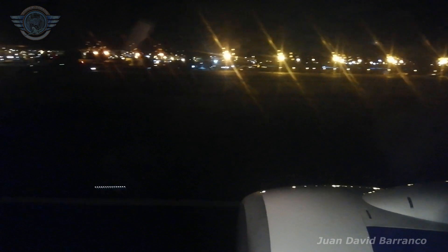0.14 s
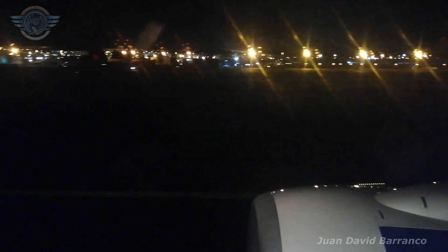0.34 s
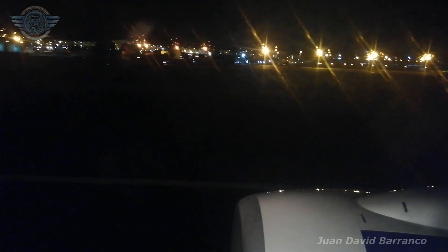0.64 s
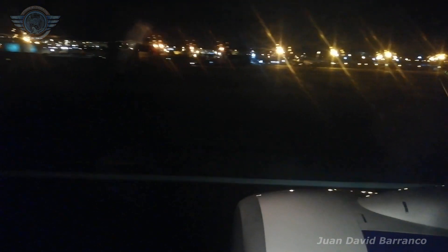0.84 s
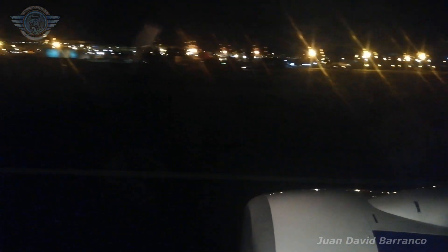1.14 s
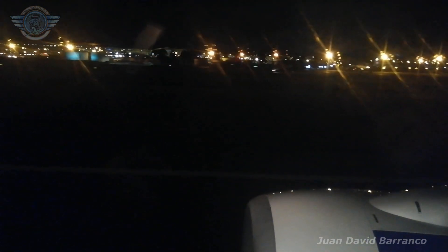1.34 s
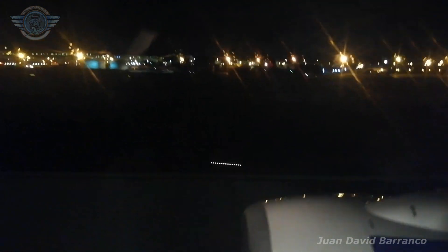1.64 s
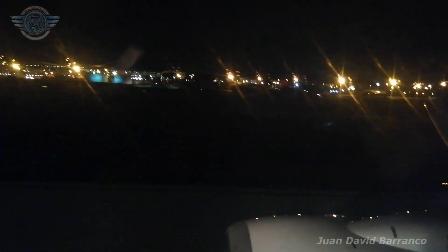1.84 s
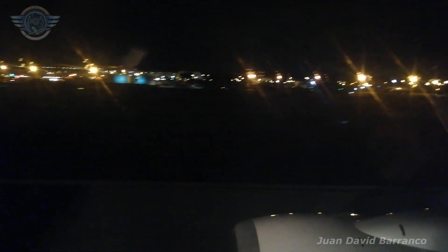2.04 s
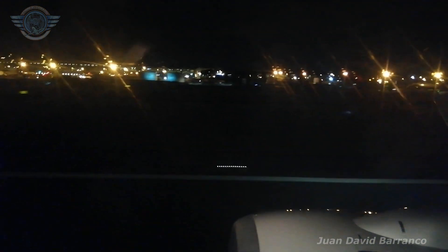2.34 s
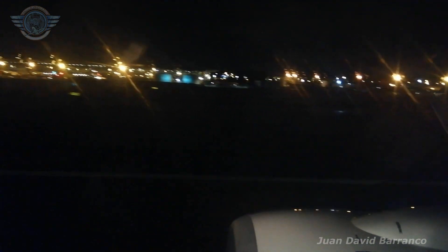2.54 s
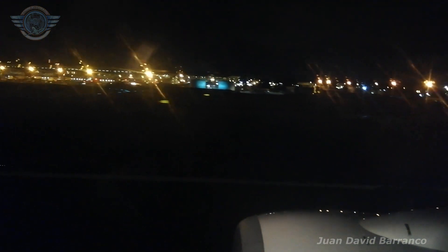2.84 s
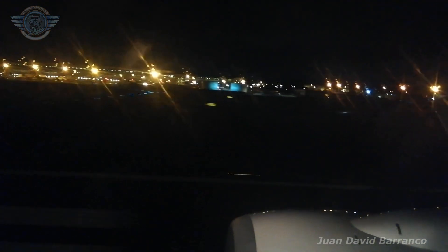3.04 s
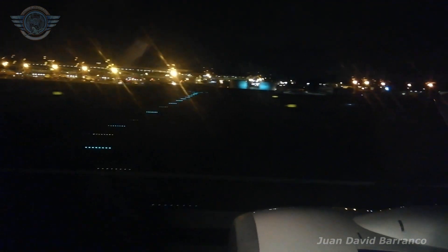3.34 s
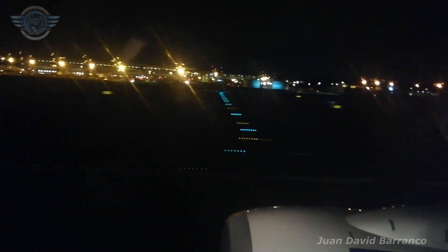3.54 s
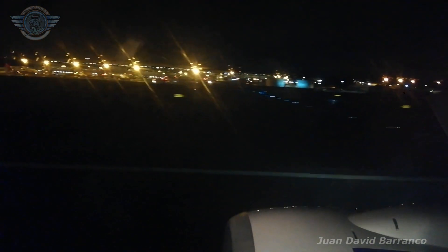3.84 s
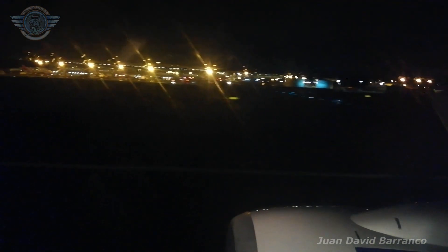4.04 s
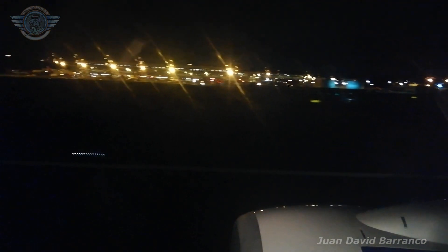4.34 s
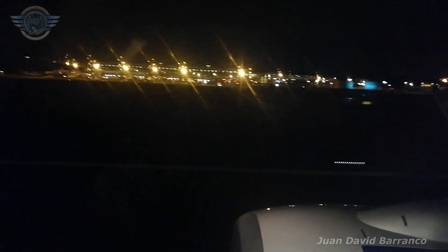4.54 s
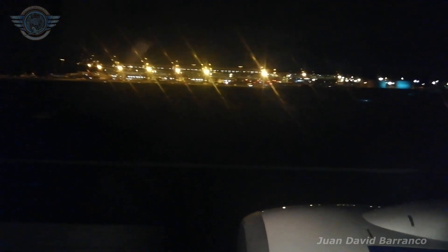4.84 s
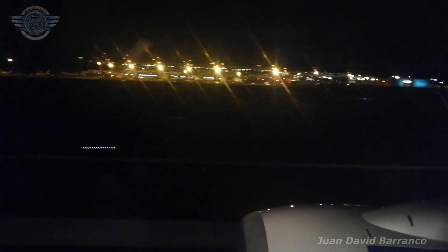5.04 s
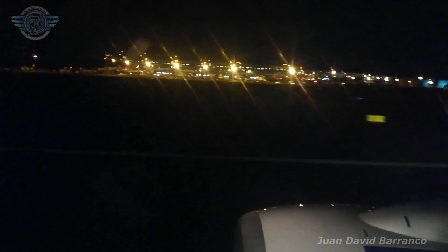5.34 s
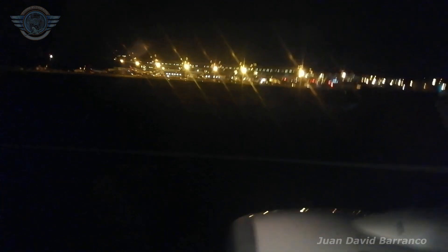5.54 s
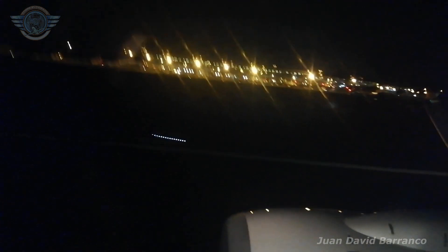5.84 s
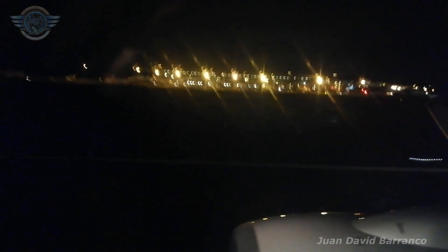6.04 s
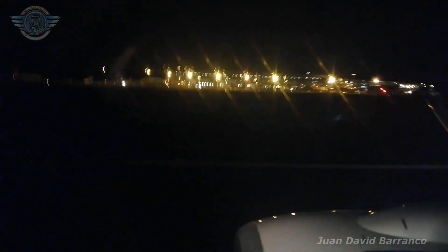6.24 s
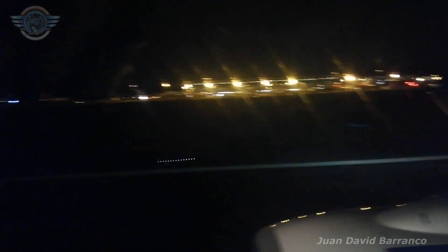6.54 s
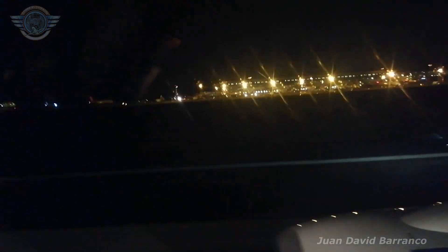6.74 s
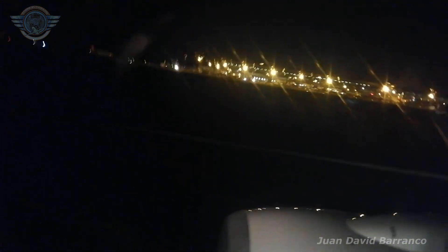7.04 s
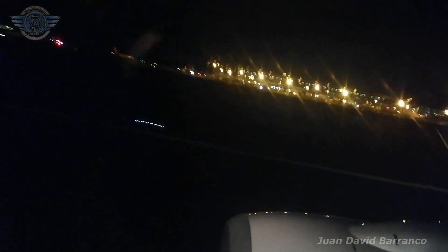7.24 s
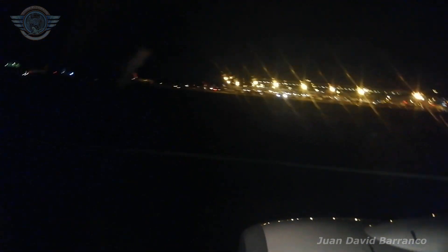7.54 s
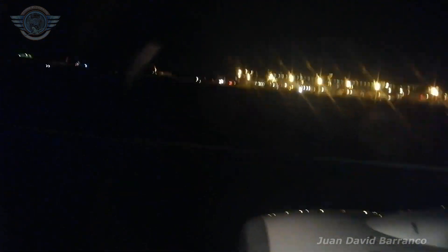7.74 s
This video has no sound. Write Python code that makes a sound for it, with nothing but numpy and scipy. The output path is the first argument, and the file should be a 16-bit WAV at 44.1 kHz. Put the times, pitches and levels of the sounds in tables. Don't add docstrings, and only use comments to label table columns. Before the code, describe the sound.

Low jet rumble, airflow and vent hiss fill an aircraft cabin before the wheels land, the hull booms, and loose panels slap, squeak and snap.

```python
import sys
import numpy as np
from scipy import signal
from scipy.fft import rfft, irfft, next_fast_len
from scipy.io import wavfile
from scipy.ndimage import uniform_filter1d, minimum_filter1d, map_coordinates

SR = 44100
rng = np.random.default_rng(int(sys.argv[2]) if len(sys.argv) > 2 else 0)


def gain_from_db(level_db):
    decades = np.asarray(level_db, float) / 20
    return 10 ** decades


def dump_mix(stems):
    frames = np.atleast_2d(stems).T
    limited = np.clip(frames, -1, 1)
    pcm = np.round(limited * 32767).astype(np.int16)
    wavfile.write(sys.argv[1], SR, pcm)


N = 348831

# time in seconds, frequency in Hz.
HULL_MODE = [(0, 57), (.9, 51.9), (1.4, 55.1), (1.75, 72.3), (2.3, 56.6), (3.4, 49.25), (4.5, 62),
             (5.6, 75.9), (5.85, 72.2), (6.1, 61.77), (6.35, 48.2), (6.7, 67), (6.95, 53.8), (7.25, 61.7),
             (7.55, 46.67), (7.91, 45.5)]
# centre in seconds, level in dB, half length in seconds.
GUSTS = [(.15, -13.5, .06), (.28, -14, 0.053), (.42, -16, 0.015), (.52, -16.5, 0.038), (.84, -15.5, 0.064),
         (1.11, -14, 0.098), (1.38, -15, 0.084), (1.5, -15, .05), (1.72, -14, 0.14), (1.97, -19, 0.051),
         (2.25, -20, 0.077), (2.4, -14, 0.046), (2.68, -16, 0.061), (2.9, -19, 0.09), (3.04, -21, 0.055),
         (3.3, -17.5, 0.19), (4.21, -22, 0.038), (4.42, -23, 0.11), (4.72, -26, 0.19), (5.0, -34, 0.035),
         (5.12, -17, .05), (5.3, -28, 0.024), (5.45, -27, 0.1)]
# centre in seconds, level in dB, half length in seconds.
BUMPS = [(5.7, -14, 0.12), (5.845, -8, 0.099), (5.96, -10.5, 0.072), (6.102, -7.5, 0.065),
         (6.322, -8.5, 0.12), (6.51, -11.5, 0.043), (6.65, -12, 0.049), (6.932, -12, 0.053),
         (7.1, -15, 0.14), (7.26, -10.5, 0.11), (7.535, -11.5, 0.059), (7.68, -12.5, 0.069),
         (7.82, -14, 0.1)]
# frequency in Hz, density in dB per Hz.
SHAKE_SPECTRUM = [(11, -38), (18, -15.5), (31, -10), (54, -1.5), (110, -7.5), (140, -25), (240, -120)]

# time in seconds, frequency in Hz, level in dB.
SHAFT = [(0, 212, -31), (1.3, 213, -23), (2, 208.6, -30.5), (2.6, 208, -30), (3.3, 204.9, -24),
         (4.3, 197.6, -31.5), (4.8, 196, -27.5), (5.05, 195, -22.5), (5.2, 193.9, -21.5),
         (5.65, 192, -14.5), (5.8, 191, -29), (5.95, 190.5, -25), (6.25, 190, -27), (6.5, 189.4, -19),
         (6.8, 189.2, -24.5), (7.1, 189, -14), (7.4, 189.8, -30.5), (7.91, 194, -21.5)]
# centre in seconds, frame level in dB, floor level in dB, half length in seconds.
JET_SURGES = [(.05, -21.5, -39, 0.23), (0.343, -21, -26, 0.24), (0.733, -18, -19, 0.064),
              (0.956, -18.5, -18, 0.07), (1.157, -22.5, -38, 0.12), (1.402, -37, -18, 0.062),
              (1.634, -16.5, -18, 0.074), (1.956, -30, -19.5, 0.2), (2.327, -15.5, -41, 0.064),
              (2.649, -22, -25.5, 0.18), (4.494, -22.5, -26, 0.24), (5.608, -20, -18, 0.027),
              (5.89, -11.5, -24, .06), (6.002, -19, -20, 0.045), (6.31, -30, -36, 0.036),
              (6.535, -21.5, -21.5, .08), (6.78, -43, -20.5, .12), (7.206, -18.5, -20, 0.16),
              (7.44, -21, -14.5, 0.059), (7.71, -24.5, -20, 0.24), (7.858, -20, -16.5, 0.062)]
# frequency in Hz, density in dB per Hz.
FRAME_SPECTRUM = [(53, -23.5), (90, -1), (135, -0.5), (175, -2.5), (230, -30), (390, -120)]
FLOOR_SPECTRUM = [(97, -29), (165, -0.5), (210, 3), (237, -11.5), (245, -11.5), (320, -38), (540, -120)]
SKIN_SPECTRUM = [(140, -48), (235, 0.5), (313, -2), (377, -10.5), (404, -14), (460, -15.5), (520, -25),
                 (680, -65), (1140, -120)]
# time in seconds, gain in dB.
AUTO_GAIN = [(0, -.5), (.33, -2.5), (.55, -0.5), (1.8, -1.5), (2.27, 1.5), (2.62, 0), (3.7, 0.5),
             (4.4, -.5), (4.85, 0.5), (5.7, -1), (6.12, .5), (6.37, -5), (6.61, -3), (6.94, -1), (7.2, -3),
             (7.5, -0.5), (7.75, -1.5), (7.91, -0.5)]

# frequency in Hz, width in Hz, level in dB.
DUCTS = [(1043, 47, -10), (1150, 95, -6), (1487, 13, -13), (1898, 52, -12), (2010, 85, -7),
         (2317, 76, -10.5), (2952, 36, -12.5), (3730, 50, -12.5)]
# frequency in Hz, density in dB per Hz.
RUSH_SPECTRUM = [(260, -11.5), (450, -1.5), (735, -6), (1060, -7.5), (1360, -11.5), (1760, -11.5),
                 (1960, -11.5), (2730, -14.5), (3800, -16.5), (4940, -34), (8360, -120)]
HISS_SPECTRUM = [(1900, -15), (3200, -8), (3800, -5), (4450, -4.5), (5350, -5), (5900, -8.5), (8150, -11.5),
                 (10300, -6.5), (11700, -13.5), (12300, -18.5), (14000, -23.5), (15700, -31), (17000, -60)]
# frequency in Hz, left-right likeness from -1 to 1.
CABIN_LIKENESS = [(450, 0.28), (600, 0.34), (1100, 0.18), (1500, 0.12), (2200, 0.0039), (2800, -0.011),
                  (3700, 0.23), (5000, -0.0078), (12000, 0.072)]

# frequency in Hz, level in dB, fade in dB per second.
PUMP_LINES = [(5270, -66, 1), (6557, -80, 1), (7849, -63.5, 2.5), (9135, -69, 0), (10427, -56, 4.5),
              (10535, -65, 1)]
# time in seconds, level in dB, share of full speed.
PUMP_RUN = [(0, 0, 1), (1.85, 0, 1), (2.0, -3, .989), (2.25, -3, .971), (2.6, -4, .943), (2.85, -6, .921),
            (3.2, -15, .885), (3.75, -25, .812), (4.15, -40, .778), (4.5, -60, .74), (7.91, -60, .5)]

# centre in seconds, level in dB, half length in seconds.
SHIVERS = [
    (.53, -55, .07),
    (5.7, -52, .04),
    (5.77, -51, .04),
    (5.865, -54, .015),
    (6.09, -52, .05),
    (6.245, -51, .03),
    (7.46, -51, .05),
    (7.6, -52, .06),
    (7.785, -49, .03),
]
# start in seconds, peak in dB, pitch in Hz, T60 in seconds, left-right in dB.
SQUEAKS = [(1.245, -28.5, 1210, 0.068, -4), (1.4935, -31, 1160, 0.071, -10), (4.47, -45, 2820, .08, 4),
           (5.038, -33, 1180, 0.072, -6), (5.472, -35, 1090, 0.064, -5), (5.907, -35, 4180, .1, -6),
           (5.992, -31, 1506, 0.088, 7), (6.0, -33, 1060, .07, 0), (6.098, -33, 1540, .09, 9),
           (6.21, -34, 1520, 0.13, 12), (6.212, -29, 1190, 0.068, -3), (6.247, -31, 1200, .08, -5),
           (6.745, -41, 1990, 0.13, -13), (6.842, -34, 3090, 0.046, -16), (7.292, -30.5, 4150, 0.02, -14),
           (7.374, -28, 1175, 0.068, -5), (7.77, -38.5, 3650, 0.1, -8), (7.788, -39, 3500, 0.086, -8),
           (6.878, -40, 2970, .06, -10), (6.797, -41, 1950, .08, -8), (6.859, -36, 1040, .06, -4),
           (7.772, -36, 1556, 0.072, 0), (5.7, -38, 1990, .08, -6), (6.472, -41, 2000, .1, -8)]
# start in seconds, level in dB, low part in dB.
TICKS = [(1.494, -56, 19), (5.604, -45, -2), (5.9115, -29, -15), (6.0113, -34, -6), (6.3031, -37, -8),
         (7.2925, -50, 10), (7.3311, -39, -2), (7.368, -32, -5), (7.3785, -33, -6), (7.3985, -36, -4),
         (7.411, -32, -9), (7.6609, -45, -6), (7.7527, -35, -6), (7.768, -43, 4), (7.778, -43, 5),
         (7.792, -50, 12), (7.8769, -42, -6)]
# frequency in Hz, density in dB per Hz.
SNAP_SPECTRUM = [(2500, -25), (4000, -2), (7000, 1), (10500, 1), (12500, -10), (15700, -11), (17000, -60)]
# centre in seconds, level in dB, half length in seconds, upper part in dB.
CREAKS = [(1.508, -39, 0.013, -6), (5.047, -38, 0.02, -6), (5.478, -39, 0.0098, -10),
          (5.725, -38.5, 0.049, -7), (6.03, -42, 0.095, -2), (6.24, -44.5, 0.038, -2),
          (6.35, -46, 0.071, -6), (6.84, -41, 0.07, -4), (7.336, -46, 0.024, 3), (7.38, -40, 0.02, -7),
          (7.419, -41, 0.021, -3), (7.553, -44.5, 0.16, -17), (7.779, -44, 0.032, 4)]
# frequency in Hz, density in dB per Hz.
CREAK_SPECTRUM = [(320, -30), (550, -1), (800, 0), (1200, -3), (1700, -20), (2600, -42), (5000, -120)]
DULL_SPECTRUM = [(600, -34), (1300, 0.5), (2000, 0), (2600, -4.5), (3300, -1), (5000, -6), (7500, -12),
                 (11000, -120)]
TRIM_SPECTRUM = [(1650, -41), (2800, -16), (4500, -0.5), (5300, 1.5), (6300, -2.5), (8300, -3.5),
                 (9500, -0.5), (10600, -1.5), (12000, -16), (15700, -24), (17000, -62)]
# start in seconds, length in seconds, first slap in dB, loss in dB per turn, low part in dB.
RATTLE_RUNS = [(2.0489, 0, -37, 0, -4), (2.2094, 0, -38, 0, -2), (5.5956, 0, -35, 0, -9),
               (5.6895, 0, -37, 0, -3), (5.9107, 0, -31, 2, -14), (5.967, .043, -33.5, -7, -2),
               (6.0294, 0, -35, 0, -4), (6.2125, 0, -38, 0, 11), (6.2594, 0, -35, 0, 6),
               (6.299, .043, -28, 7, -2), (6.473, .043, -38, 0, 3), (6.8124, 0, -33.5, 0, -2),
               (7.045, 0, -36, 0, -6), (7.1294, 0, -37, 0, -1), (7.3245, 0, -29, 0, -12),
               (7.3345, 0, -26, 0, -10), (7.369, .043, -21.5, -1, -8), (7.3814, 0, -27, 0, -3),
               (7.4939, 0, -33, 0, -6), (7.536, .17, -28.5, 2.5, -8), (7.7494, 0, -28, 0, -7),
               (7.772, 0, -38, 0, 9), (7.835, .043, -35, 3, 10)]

# frequency in Hz, left-right in dB.
PORT_COLOUR = [(300, -2), (450, -3.5), (680, 2), (1010, -1.5), (1510, -4), (2270, -5.5), (3390, -6),
               (5080, -7.5), (7600, 1), (10400, 17.5), (12500, 8), (15500, 6)]
# frequency in Hz, right lead in radians.
PORT_LEAD = [(50, 0.06), (400, 0.38), (480, 3.5), (800, 3.04), (1050, 5.9), (1350, 3.8), (1900, 5.25),
             (2200, 8.3), (2700, 5.2), (3100, 5.9), (4200, 8.4)]

TOUCH_S, SETTLE_S = 5.62, 0.052
CALM_DB, ROLL_DB = -23.5, -17.5
TYRE_HZ, TYRE_SHARE = 36, 0.88
FRAME_DB, FLOOR_DB, SKIN_DB, JET_SINKS_DB_PER_S = -22, -24, -30.5, 0.2
SKIN_GAIN_SHARE, SKIN_DUCK_SHARE = 0.47, 0.43
RUSH_DB, HISS_DB, HISS_GAIN_SHARE = -43, -49.5, 1.12
VENT_DB, VENT_LANDED_DB, VENT_DUCK_SHARE = 0.5, -0.5, 0.7
ROTOR_HZ, ROTOR_DB, PIPE_HZ, PIPE_WIDTH_HZ = 1304, -47, 1035, 32
SNAP_T60_S, SNAP_LOW_T60_S = 0.019, 0.051
WHEEL_TURN_S, SLAP_T60_S, SLAP_SCATTER_DB = 0.042, 0.069, 1.5
TICK_DB, TICK_T60_S = -5, 0.0083
PULSE_S, PULSE_DB, PULSE_HALF_S = 7.9085, -4.5, 0.0024


def unit(x):
    return x / np.sqrt(np.mean(x ** 2) + 1e-20)


def along(points, hz):
    f, v = np.transpose(points)
    return np.interp(np.log(hz + 1), np.log(f + 1), v)


def curves(rows):
    s, *cols = np.transpose(rows)
    return [np.interp(np.arange(N) / SR, s, c) for c in cols]


def wobble(rate_hz):
    knots = rng.standard_normal(int(N * rate_hz / SR) + 4)
    return map_coordinates(knots, [np.arange(N) * rate_hz / SR])


def filtered(x, response):
    m = next_fast_len(N + 8192)
    tail = x[..., :-2049:-1] * np.hanning(4096)[2048:]
    x = np.concatenate([x, tail], axis=-1)
    return irfft(rfft(x, m) * response(np.fft.rfftfreq(m, 1 / SR)), m)[..., :N]


def noise(spectrum, alike, patchy_db):
    z = signal.stft(rng.standard_normal((2, N)), nperseg=512)[2]
    field = uniform_filter1d(rng.standard_normal(z.shape[1:]), size=8, axis=0)
    field = uniform_filter1d(field, size=12, axis=1)
    pair = signal.istft(z * gain_from_db(patchy_db * unit(field)), nperseg=512)[1][:, :N]

    def mid_side(hz):
        turn = np.arccos(np.clip(along(alike, hz), -1, 1)) / 2
        return gain_from_db(along(spectrum, hz)) * [np.cos(turn), np.sin(turn)]

    mid, side = filtered(pair, mid_side)
    return unit(np.array([mid + side, mid - side]))


def evened(x, span_s):
    power = np.abs(uniform_filter1d(np.mean(x ** 2, axis=0), max(int(span_s * SR), 2)))
    return unit(x / np.sqrt(power + 0.049))


def phase(hz):
    return 2 * np.pi * np.cumsum(hz) / SR


def swells(rows, calm_db):
    coarse_s = np.arange(0, N + 64, 64) / SR
    power = sum(gain_from_db(db) ** 2 * np.exp(-2 * ((coarse_s - s) / half_s) ** 2) for s, db, half_s in rows)
    return np.sqrt(gain_from_db(calm_db) ** 2 + np.interp(np.arange(N) / SR, coarse_s, power))


def burst(t, db, t60_s, rise_s):
    return gain_from_db(db - 60 * t / t60_s) * (1 - np.exp(-t / rise_s))


def landed():
    return .5 + .5 * np.tanh((np.arange(N) / SR - TOUCH_S) / SETTLE_S)


def ducked_db():
    return 20 * np.log10(uniform_filter1d(swells(BUMPS, ROLL_DB), int(.12 * SR))) - ROLL_DB


def boom():
    ring = np.sqrt(2) * np.sin(phase(curves(HULL_MODE)[0]) + wobble(16))
    shake = noise(SHAKE_SPECTRUM, [(30, .995), (60, 0.98)], patchy_db=-4)
    shudder = filtered(shake, lambda hz: 1 / (1 + (hz / TYRE_HZ) ** 6))
    shake = shake + TYRE_SHARE * landed() * shudder
    level = swells(GUSTS + BUMPS, CALM_DB + landed() * (ROLL_DB - CALM_DB))
    return level * evened(unit(0.6 * ring + shake), span_s=0.065)


def jet_rumble():
    idling_db = -JET_SINKS_DB_PER_S * np.arange(N) / SR * (1 - landed())
    frame_level = swells([(s, db, half_s) for s, db, _, half_s in JET_SURGES], FRAME_DB + idling_db)
    floor_level = swells([(s, db, half_s) for s, _, db, half_s in JET_SURGES], FLOOR_DB)
    skin_db = SKIN_DB + SKIN_GAIN_SHARE * curves(AUTO_GAIN)[0] - SKIN_DUCK_SHARE * ducked_db()
    frame = evened(noise(FRAME_SPECTRUM, [(90, 1.0)], patchy_db=-1.0), span_s=0.088)
    floor = evened(noise(FLOOR_SPECTRUM, [(200, 0.95)], patchy_db=-2), span_s=0.14)
    skin_alike = [(250, 1.0), (350, 0.87), (450, 0.18)]
    skin = evened(noise(SKIN_SPECTRUM, skin_alike, patchy_db=0.0), span_s=0.17)
    return gain_from_db(0.1) * frame_level * frame + gain_from_db(-1.5) * floor_level * floor + gain_from_db(skin_db + 1.64) * skin


def shaft_hum():
    shaft_hz, shaft_db = curves(SHAFT)
    level = gain_from_db(shaft_db - 1.5 + 1.8 * wobble(9))
    return level * np.sqrt(2) * np.sin(phase(shaft_hz) + .55 * wobble(8))


def duct_song():
    def modes(hz):
        total = 0
        for centre_hz, width_hz, db in DUCTS:
            drive = 1j * hz * width_hz
            total = total + gain_from_db(db) / np.sqrt(width_hz) * drive / (centre_hz ** 2 - hz ** 2 + drive)
        return total * np.abs(total) ** 0.45

    return unit(filtered(noise([(600, 0)], [(600, 0.9)], patchy_db=1.0), modes))


def air():
    gain_db, = curves(AUTO_GAIN)
    gust_db = .3 * wobble(7) + .55 * wobble(22)
    song_db = VENT_DB + VENT_LANDED_DB * landed() - VENT_DUCK_SHARE * ducked_db() - 4.0
    low = gain_from_db(2.5) * noise(RUSH_SPECTRUM, CABIN_LIKENESS, patchy_db=0.65) + gain_from_db(song_db) * duct_song()
    hiss = noise(HISS_SPECTRUM, CABIN_LIKENESS, patchy_db=0.5)
    hiss_db = HISS_DB + HISS_GAIN_SHARE * gain_db + 2.0
    return gain_from_db(RUSH_DB + gain_db + gust_db) * low + gain_from_db(hiss_db + gust_db) * hiss


def pump():
    run_db, speed = curves(PUMP_RUN)
    t = np.arange(N) / SR
    whine = np.zeros(N)
    for hz, db, fade_db_per_s in PUMP_LINES:
        level = gain_from_db(db + 5 - fade_db_per_s * t + 1.3 * wobble(25))
        whine += level * np.sin(phase(hz * speed) + .85 * wobble(45))
    rotor_hz = ROTOR_HZ * speed
    resonance = np.exp(-((rotor_hz - PIPE_HZ) / PIPE_WIDTH_HZ) ** 2)
    rotor = gain_from_db(ROTOR_DB + 1.5 * wobble(9)) * resonance * np.sin(phase(rotor_hz) + .4 * wobble(12))
    return gain_from_db(run_db) * whine + rotor


def shivers():
    level = swells(SHIVERS, calm_db=-90) * gain_from_db(1.5 * wobble(400))
    return level * noise(TRIM_SPECTRUM, CABIN_LIKENESS, patchy_db=1.5)


def squeaks():
    out, t = np.zeros((2, N + SR)), np.arange(SR // 4) / SR
    for s, db, hz, t60_s, pan_db in SQUEAKS:
        jitter = np.cumsum(rng.normal(0, 0.088, len(t)))
        ring = burst(t, db + 0.5, t60_s, 6.5 / hz) * np.sin(2 * np.pi * hz * t + jitter)
        start = round(s * SR)
        out[:, start:start + len(t)] += ring * gain_from_db(np.array([[.5], [-.5]]) * (pan_db + 3))
    return out[:, :N]


def ticks():
    high, low, t = np.zeros(N + SR), np.zeros(N + SR), np.arange(SR // 10) / SR
    for s, db, low_db in TICKS:
        start = round(s * SR)
        high[start:][:len(t)] += burst(t, db, SNAP_T60_S, 0.00049)
        low[start:][:len(t)] += burst(t, db + low_db, SNAP_LOW_T60_S, 0.00092)
    bright = high[:N] * noise(SNAP_SPECTRUM, [(5000, 0.23)], patchy_db=1.5)
    return bright + low[:N] * noise(DULL_SPECTRUM, CABIN_LIKENESS, patchy_db=1.5)


def creaks():
    now = np.arange(N) / SR
    low, upper = np.zeros(N), np.zeros(N)
    for s, db, half_s, upper_db in CREAKS:
        swell = gain_from_db(db) * np.exp(-((now - s) / half_s) ** 2)
        low += swell
        upper += gain_from_db(upper_db + 1.5) * swell
    creak = low * noise(CREAK_SPECTRUM, CABIN_LIKENESS, patchy_db=1.5)
    creak = creak + upper * noise(DULL_SPECTRUM, CABIN_LIKENESS, patchy_db=3.0)
    return gain_from_db(1.8 * wobble(120)) * creak


def rattles():
    bright, dull, t = np.zeros(N + SR), np.zeros(N + SR), np.arange(SR // 4) / SR
    for s, length_s, first_db, loss_db, low_db in RATTLE_RUNS:
        for k in range(round(length_s / WHEEL_TURN_S) + 1):
            start = round((s + k * WHEEL_TURN_S) * SR)
            db = first_db - k * loss_db - SLAP_SCATTER_DB * (k % 2)
            slap = burst(t, db - 7, SLAP_T60_S, .003)
            contact = burst(t, db - 15.0 + TICK_DB, TICK_T60_S, 0.0011)
            bright[start:][:len(t)] += slap + contact
            dull[start:][:len(t)] += gain_from_db(low_db - 3.5) * slap
    chatter = gain_from_db(2.7 * wobble(500))
    trim = chatter * bright[:N] * noise(TRIM_SPECTRUM, [(5000, 0.11)], patchy_db=1.7)
    return trim + dull[:N] * noise(DULL_SPECTRUM, CABIN_LIKENESS, patchy_db=-3.5)


def end_pulse():
    return gain_from_db(PULSE_DB) * np.exp(-((np.arange(N) / SR - PULSE_S) / PULSE_HALF_S) ** 2)


def scene():
    structure = boom() + jet_rumble() + shaft_hum()
    trim = shivers() + squeaks() + ticks() + creaks() + rattles() + end_pulse()
    return structure + air() + pump() + trim


def band_limit(x):
    return signal.sosfilt(signal.butter(12, 15790, fs=SR, output="sos"), x)


def record(dry):
    def ports(hz):
        colour_db = along(PORT_COLOUR, hz) * np.clip(hz / 200 - 1, 0, 1)
        left = 1 / (1 + gain_from_db(-2 * colour_db))
        lag = np.exp(.5j * along(PORT_LEAD, hz))
        return np.sqrt(2 * np.array([left, 1 - left])) * [1 / lag, lag]

    x = filtered(dry, ports)
    needed = minimum_filter1d(.92 / np.maximum(np.abs(x).max(axis=0), .92), size=661)
    mix = x * uniform_filter1d(needed, size=441)
    return band_limit(mix)


dry = scene()
out = record(dry)
dump_mix(out)
```